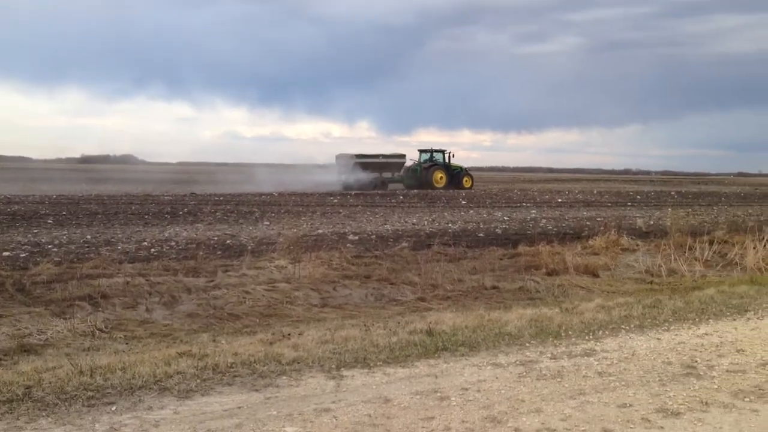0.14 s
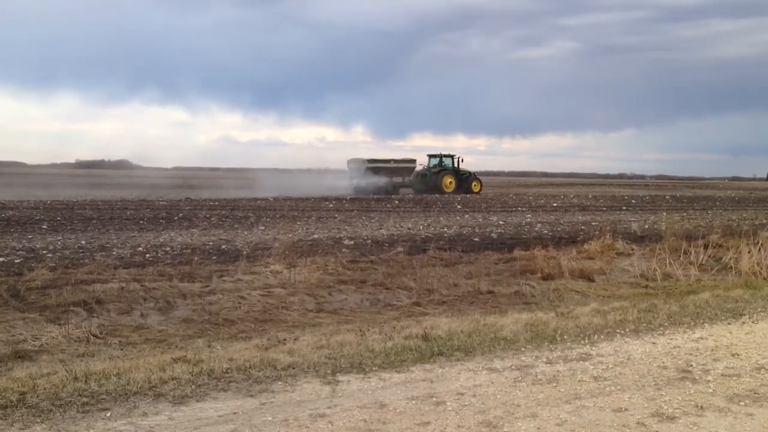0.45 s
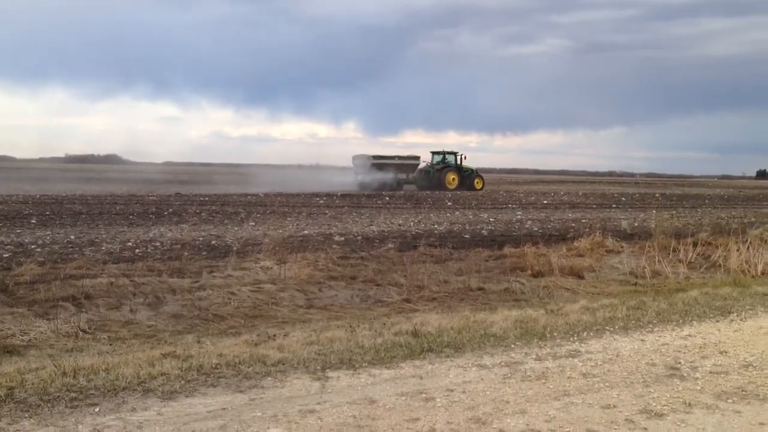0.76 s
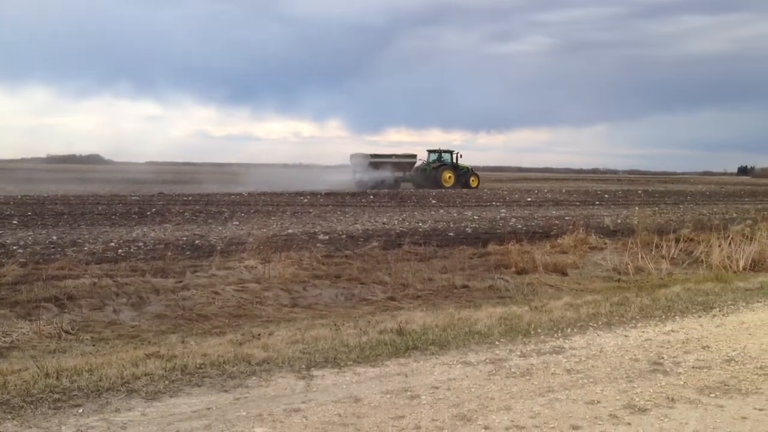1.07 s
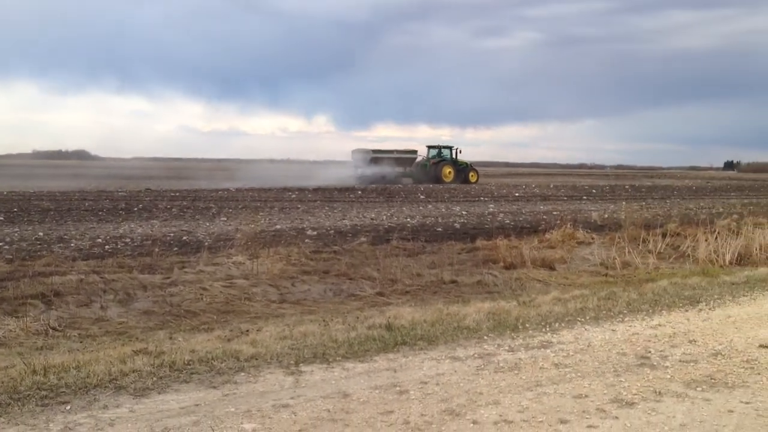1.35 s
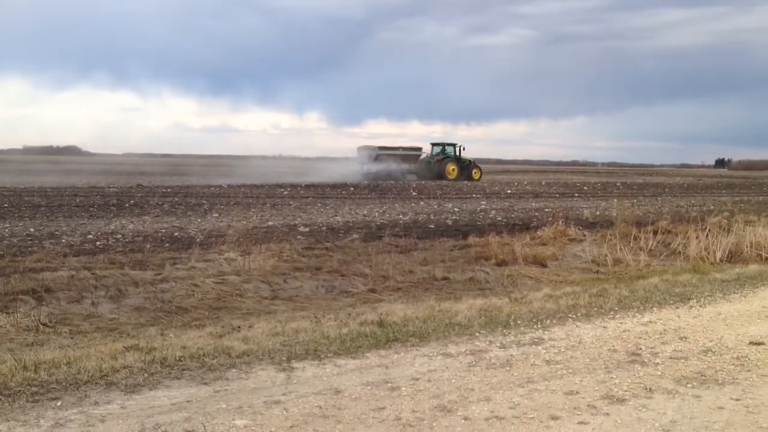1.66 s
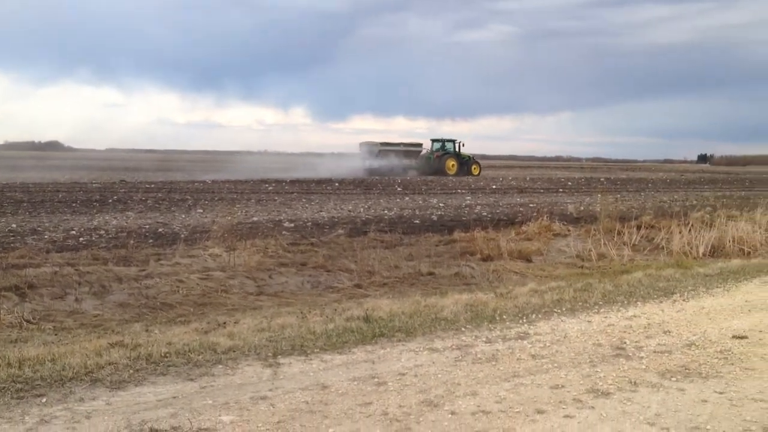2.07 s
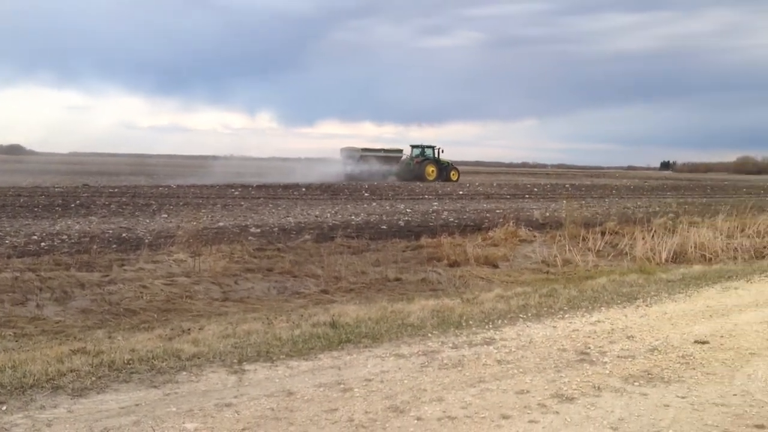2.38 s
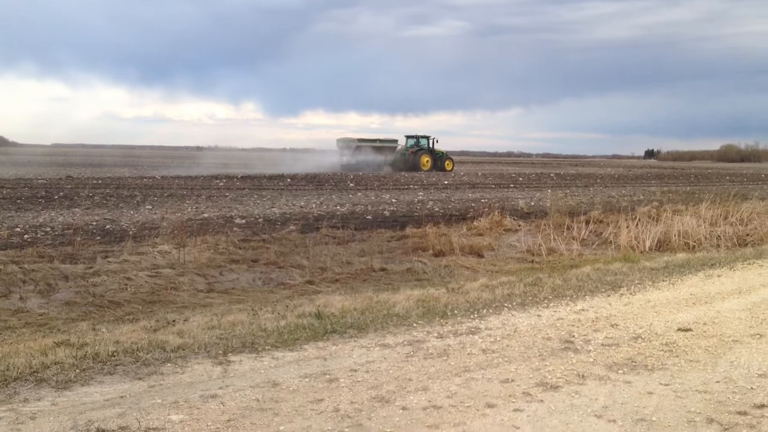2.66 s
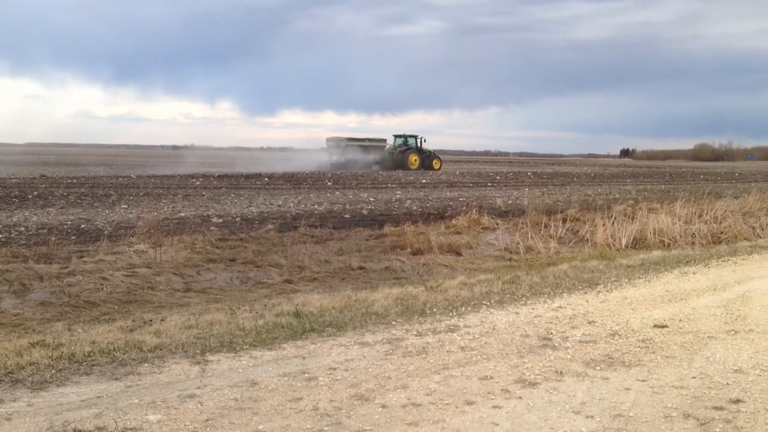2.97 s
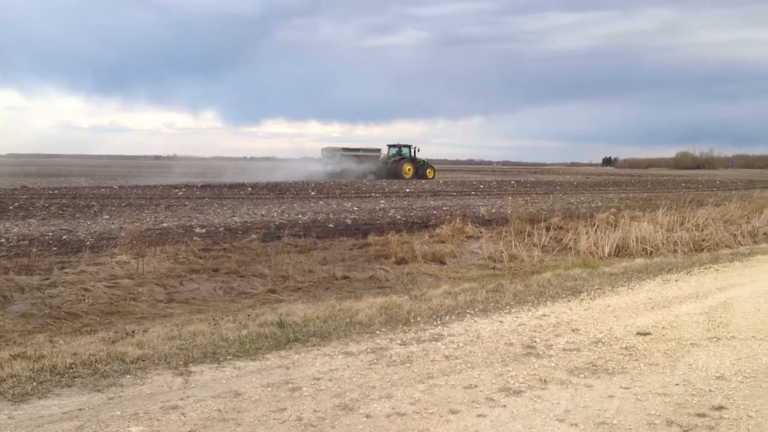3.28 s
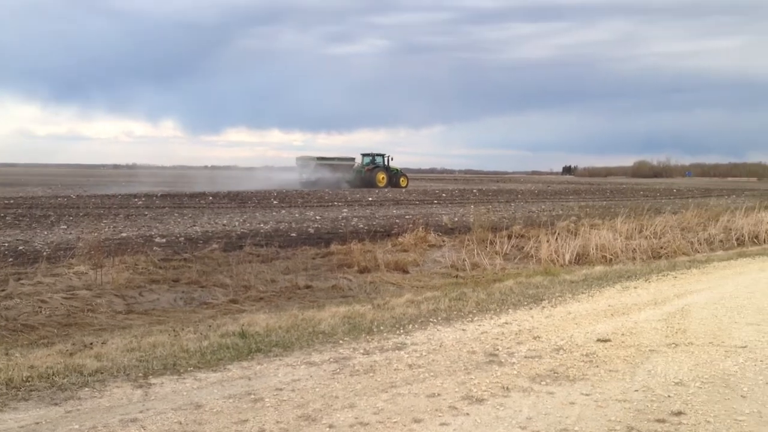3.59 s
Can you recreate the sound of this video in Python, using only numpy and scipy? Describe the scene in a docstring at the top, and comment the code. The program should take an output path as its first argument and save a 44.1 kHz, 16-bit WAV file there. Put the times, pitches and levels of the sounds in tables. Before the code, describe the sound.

A tractor runs at steady revs some way off in an open field, droning low with a whine and roar. Its spreader adds a hiss of granules and thin metallic squeaks, while light wind occasionally bumps the microphone.

```python
"""Tractor with fertiliser spreader

A tractor works an open field, some way off, at steady revs. Exhaust drone, pump and gear whine and
engine roar carry over the soil, which cancels the band near 500 Hz (a gap set in the spectra).
Granules rattle on the ringing spinner discs; light wind bumps the microphone."""
import sys
import numpy as np
from scipy import signal
from scipy.fft import rfft, irfft
from scipy.io import wavfile
from scipy.ndimage import uniform_filter1d

SR = 44100
rng = np.random.default_rng(int(sys.argv[2]) if len(sys.argv) > 2 else 0)


def wav_out(sig):
    """Save sig, one row per channel (or a flat mono array), as 16-bit PCM at SR to the path in sys.argv[1]."""
    wavfile.write(sys.argv[1], SR, np.round(np.clip(np.atleast_2d(sig).T, -1, 1) * 32767).astype(np.int16))


N = 164493

SHAFT_HZ, PUMP_HZ, SPINNER_HZ, WHINE_HZ = 44.5, 249.6, 55.2, 4211
# Source envelopes: t/s, roar gain/dB, granule gain/dB, exhaust gain/dB
ENVELOPES = [(0, -38, -49, -2), (.4, -39, -47, 0.5), (.8, -38.5, -48, 0.5), (1.15, -39, -48, -0.5),
             (1.4, -39.5, -47, -1.5), (1.6, -40, -46.5, 1.5), (1.9, -40, -46.5, -3),
             (2.25, -40, -50.5, -1.5), (2.55, -40.5, -49.5, 0), (2.75, -40.5, -48.5, -5),
             (2.95, -41, -45.5, -2), (3.2, -40.5, -50, -0.9), (3.73, -40.5, -51.5, 0.5)]
# Granule impact spectrum: f/Hz, relative density/dB
IMPACT_SPECTRUM = [(2200, -17), (2900, -14.5), (3400, 0), (4300, 5.5), (4750, -4.5), (5300, -7),
                   (6200, -15.5), (6900, -23.5), (8500, -35), (11000, -63)]


def exhaust(clock_s):
    """Low shaft partials and a rumble that chug together once a turn."""
    # Drone: shaft harmonic, level/dB
    partials = [(2, -63.5), (3, -43), (4, -45.5)]
    # Rumble: f/Hz, relative density/dB
    rumble_spectrum = [(25, -46), (50, -23.5), (80, -15.5), (110, -4), (140, 4.5), (190, 4), (240, -4),
                       (300, -10), (420, -14.5), (560, -31), (900, -64)]
    drone = sum(undb(db) * tone(k * SHAFT_HZ, clock_s, fade_db=3.5, scatter_turns=0) for k, db in partials)
    puffs = np.exp(0.25 * np.cos(2 * np.pi * SHAFT_HZ * clock_s))
    rumble = undb(-41) * unit(colour(noise() * puffs, rumble_spectrum))
    return (drone + rumble) * undb(curve(ENVELOPES, column=3))


def pump(clock_s):
    """Pump whine: harmonics of the pumping rate."""
    # Whine: pump harmonic, level/dB
    partials = [(1, -45), (2, -66.5), (3, -53.5), (4, -53), (5, -60)]
    # Envelope: t/s, gain/dB
    envelope = [(0, 0.5), (1.9, -0.5), (2.8, -0.5), (3.73, -5.5)]
    return sum(undb(db) * tone(k * PUMP_HZ, clock_s) for k, db in partials) * undb(curve(envelope))


def gears(clock_s, jitter_s=0.00013):
    """Gear and bearing tones that rise and fall with the roar."""
    # Tones: f/Hz, level/dB
    partials = [(148, -47.5), (185, -56.5), (715, -58), (1125, -59), (1561, -58.5), (1790, -74),
                (2148, -57.5), (2318, -62.5)]
    tones = sum(undb(db) * tone(hz, clock_s + jitter_s * walk(14)) for hz, db in partials)
    return tones * unit(undb(curve(ENVELOPES)))


def engine_roar(clock_s, fade_db=0.55):
    """Fan and combustion noise, pulsing at the pump rate and fading in the moving air."""
    # Roar: f/Hz, relative density/dB
    spectrum = [(350, -52), (520, -14.5), (680, -0.5), (900, 2), (1130, 2), (1420, -3.5), (1620, -1),
                (1860, -4), (2130, -1), (2350, -4.5), (2800, -16), (3500, -19.5), (6000, -51)]
    pulsing = 1 + 0.09 * np.cos(2 * np.pi * PUMP_HZ * clock_s)
    roar = colour(noise() * pulsing, spectrum) * undb(fade_db * walk(18))
    return unit(roar) * undb(curve(ENVELOPES) - 0.5)


def spreader(grains_per_s=12000, spread_db=2, fade_db=0.73):
    """Each vane flings a batch of granules; they hiss and ring the steel discs."""
    t = np.arange(N) / SR
    vanes = 1 + 0.054 * np.cos(2 * np.pi * SPINNER_HZ * t)
    hits = rng.random(N) < grains_per_s / SR
    grains = hits * noise() * undb(spread_db * rng.exponential(size=N))
    spray = unit(colour(grains, IMPACT_SPECTRUM)) * undb(curve(ENVELOPES, column=2) - 3)
    return (spray + disc_whine() + disc_ring()) * vanes * undb(fade_db * walk(39.66))


def disc_whine(flicker_db=8):
    """The spinner's strongest mode, sustained into a flickering whine with squeaks."""
    # Envelope: t/s, gain/dB
    envelope = [(0, -11), (.5, -9), (.8, -6), (1.7, -7), (2.2, -10), (2.8, -6), (3.0, -9), (3.4, -7),
                (3.73, -8)]
    flicker = unit(undb(flicker_db * np.tanh(walk(40.06))))
    held = flicker * undb(curve(envelope) - 52.8)
    return squeal(WHINE_HZ) * np.hypot(held, squeak_envelope(WHINE_HZ))


def disc_ring(rms_window_s=0.5):
    """Steel modes kept ringing by a steady stream of strikes; now and then one squeaks."""
    # Disc modes: f/Hz, bandwidth/Hz, relative level/dB, share of the swell/0-1
    modes = [(3106, 20, -66, .8), (3238, 18, -59.5, 1), (3447, 18, -57, 1), (3630, 24, -59.5, .6),
             (3828, 24, -62, .6), (4020, 30, -62, .5), (4417, 24, -62, .2), (4620, 24, -67, .2),
             (5050, 20, -73, 0), (5270, 24, -75, 0), (5733, 20, -76, 0), (5975, 16, -77.5, 0)]
    # Swell of the ringing: t/s, gain/dB
    swell = [(0, 0.5), (1.55, -2), (2.2, -4.5), (3.05, -10), (3.73, -21)]
    ringing, swell_db = np.zeros(N), curve(swell)
    for hz, width_hz, db, share in modes:
        strikes = colour(noise(), IMPACT_SPECTRUM)
        mode = signal.lfilter(*signal.iirpeak(hz, hz / width_hz, fs=SR), strikes)
        running_rms = np.sqrt(uniform_filter1d(mode ** 2, int(rms_window_s * SR)))
        ringing += undb(db + 2.5 + share * swell_db) * mode / running_rms
        ringing += squeal(hz) * squeak_envelope(hz)
    return ringing


def squeal(hz, jitter_s=0.00004):
    """A disc mode singing with a slightly unsteady pitch."""
    t = np.arange(N) / SR
    return np.sqrt(2) * np.sin(2 * np.pi * hz * (t + jitter_s * walk(22.14)))


def squeak_envelope(hz):
    """One disc mode flaring up: quick rise, short hold, quick fall."""
    # Squeaks: centre t/s, mode f/Hz, level/dB, length/s
    squeaks = [(.36, 3828, -55, .06), (.41, 3447, -51, .04), (.45, 5975, -68.5, .1), (.51, 3447, -49, .03),
               (.59, 4211, -56, .06), (.635, 3447, -49, .05), (.65, 5975, -69, .1), (.67, 5050, -66, .07),
               (.74, 4211, -57, .1), (.8, 3238, -53.5, .06), (.86, 4211, -52, .05), (.925, 4211, -53, .025),
               (.95, 3238, -55.5, .16), (1.02, 4211, -56, .04), (1.235, 3447, -54.5, .03),
               (1.24, 4211, -57, .06), (1.365, 3447, -55, .03), (1.5, 4211, -49, .025),
               (1.565, 4211, -55, .04), (1.575, 3828, -55.5, .03), (1.735, 4211, -50.5, .03),
               (2.04, 3828, -55, .05), (2.44, 4211, -53.5, .05), (2.535, 4211, -56, .025),
               (2.775, 4211, -53.5, .04), (2.86, 4211, -52, .05), (2.904, 4211, -48.5, .035),
               (3.01, 5733, -64.5, .06), (3.4, 4211, -57, .04), (3.41, 5270, -66, .025),
               (3.475, 4211, -55, .04), (3.48, 5270, -66, .03), (3.67, 5050, -66, .1)]
    t, power = np.arange(N) / SR, np.zeros(N)
    for centre_s, mode_hz, db, length_s in squeaks:
        if mode_hz == hz:
            flare = undb(db) / (1 + (2 * (t - centre_s) / length_s) ** 4)
            power += flare ** 2
    return np.sqrt(power)


def wind(flutter_lag_s=0.0055):
    """Each eddy strikes the microphone with a dull thud and a short flutter."""
    # Bumps: t/s, relative thud level/dB, relative flutter level/dB, flutter decay/s
    bumps = [(0.479, -35, -41, 0.015), (0.694, -42, -47, 0.017), (.871, -36, -40, 0.015),
             (0.894, -32.5, -39, 0.025), (.931, -30, -36, 0.025), (1.117, -31, -37, 0.014),
             (1.134, -32, -40, 0.01), (1.694, -38.5, -44, .01), (1.714, -28.5, -36, 0.02),
             (1.79, -34, -41, .02), (1.854, -33, -38.5, 0.011), (1.872, -33, -41, 0.0076),
             (2.376, -23.5, -54, 0.003), (2.392, -32, -52, 0.004), (2.711, -43, -46, .02),
             (2.736, -36, -44, .012), (2.836, -29, -42, 0.0061), (2.882, -33, -42, 0.007),
             (3.357, -35, -42, 0.0081)]
    # Thud: f/Hz, relative density/dB
    thud_spectrum = [(50, -40), (110, -1.5), (170, 6.5), (260, 0), (380, -9.5), (550, -22), (1000, -36),
                     (3000, -72)]
    # Flutter: f/Hz, relative density/dB
    flutter_spectrum = [(40, -48), (100, 7), (160, -11.5), (240, 10.5), (380, -2), (550, -15), (1000, -28),
                        (2500, -43), (6000, -88)]
    t, eddies = np.arange(N) / SR, noise()
    thuds, flutters = np.zeros(N), np.zeros(N)
    for start_s, thud_db, flutter_db, decay_s in bumps:
        flutter = eddies * np.exp(-np.abs(t - start_s) / decay_s) * (t > start_s + flutter_lag_s)
        flutters += undb(flutter_db) * flutter / np.sqrt(np.sum(flutter ** 2))
        thuds[int(start_s * SR)] += undb(thud_db)
    return undb(24.5) * colour(thuds, thud_spectrum) + undb(25.5) * colour(flutters, flutter_spectrum)


def microphone_hiss(level_db=-76.2):
    """Faint, steady noise of the microphone."""
    # Hiss: f/Hz, relative density/dB
    spectrum = [(3000, -5), (8000, -4.5), (10000, -6.3), (12000, -4), (15000, 0)]
    return undb(level_db) * colour(noise(), spectrum)


def tone(hz, clock_s, fade_db=1.5, scatter_turns=1):
    """A partial locked to the engine, fading in and out in the moving air."""
    phase = 2 * np.pi * (hz * clock_s + scatter_turns * rng.random())
    return np.sqrt(2) * np.cos(phase) * unit(undb(fade_db * walk(12)))


def undb(db):
    """Decibels to gain."""
    return 10 ** (np.asarray(db) / 20)


def unit(x):
    """Scale to rms 1."""
    return x / np.sqrt(np.mean(x ** 2))


def curve(rows, column=1):
    """One column of a time table, joined by straight lines."""
    rows = np.array(rows, float)
    return np.interp(np.arange(N) / SR, rows[:, 0], rows[:, column])


def colour(x, spectrum):
    """Filter by (f/Hz, level/dB) points, keeping the power of white noise."""
    hz, db = np.array(spectrum, float).T
    bins_hz = np.maximum(np.fft.rfftfreq(N, 1 / SR), 1)
    gain = unit(undb(np.interp(np.log(bins_hz), np.log(hz), db)))
    return irfft(rfft(x) * gain, N)


def walk(rate_hz):
    """Smooth random wander, rms 1."""
    hold = int(SR / rate_hz)
    steps = np.repeat(rng.standard_normal(256), hold)[:N]
    smooth = uniform_filter1d(uniform_filter1d(steps, hold), hold)
    return unit(smooth - smooth.mean())


def noise():
    """White noise."""
    return rng.standard_normal(N)


def scene():
    """Tractor, spreader, wind and hiss in mono."""
    clock_s = np.cumsum(1 + 0.00229 * walk(3)) / SR  # engine time: the revs drift slightly
    tractor = exhaust(clock_s) + pump(clock_s) + gears(clock_s) + engine_roar(clock_s)
    return (tractor + spreader() + wind() + microphone_hiss())[None]


def record(dry):
    """Steep low-pass on the top treble."""
    cutoff_hz = 15330
    return signal.sosfilt(signal.ellip(10, 0.2, 70, cutoff_hz, fs=SR, output="sos"), dry)


dry = scene()
out = record(dry)
wav_out(out)
```